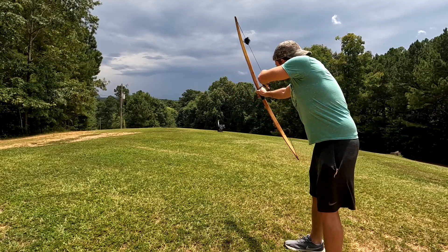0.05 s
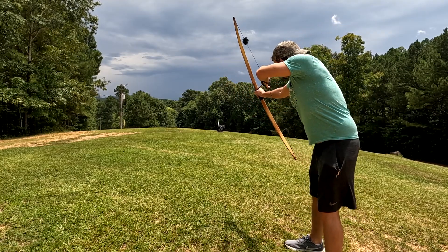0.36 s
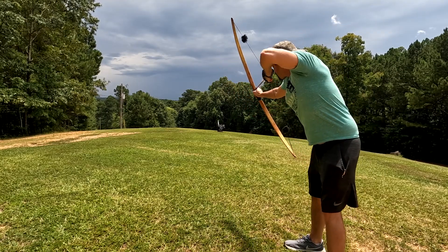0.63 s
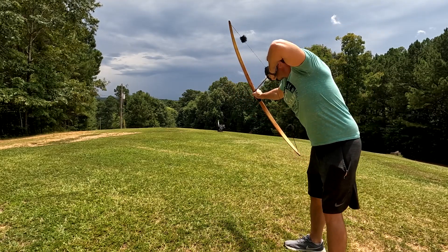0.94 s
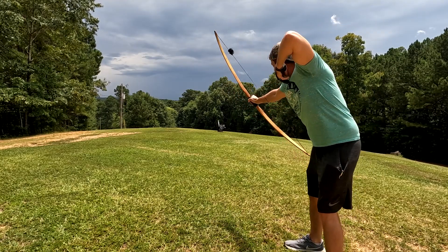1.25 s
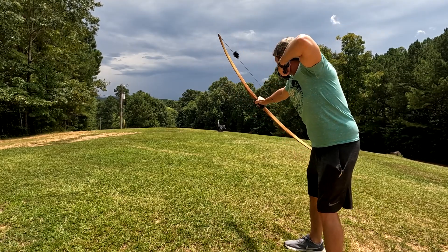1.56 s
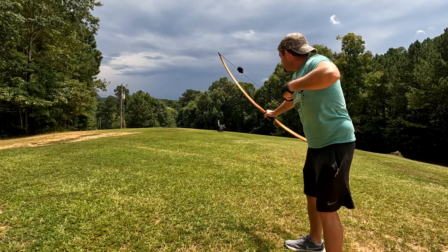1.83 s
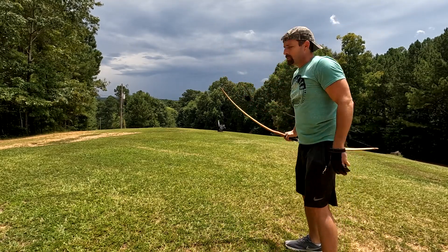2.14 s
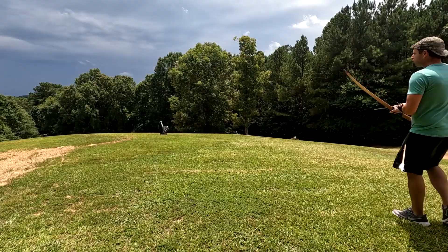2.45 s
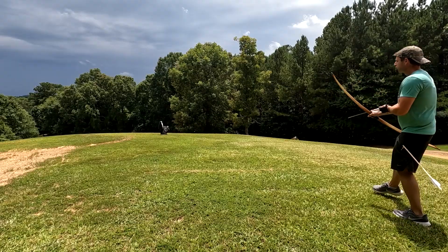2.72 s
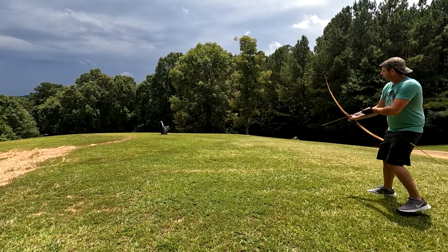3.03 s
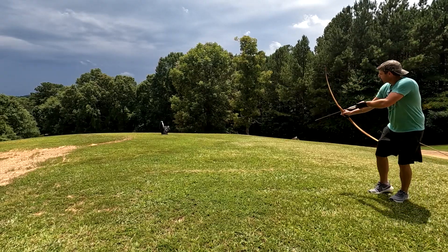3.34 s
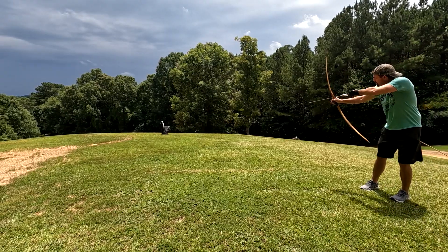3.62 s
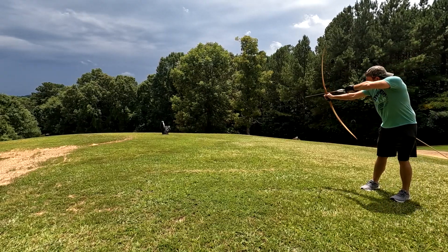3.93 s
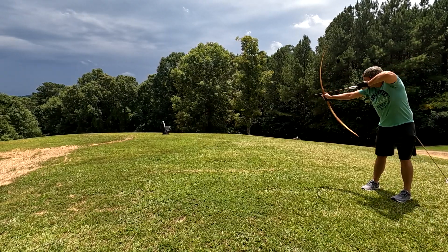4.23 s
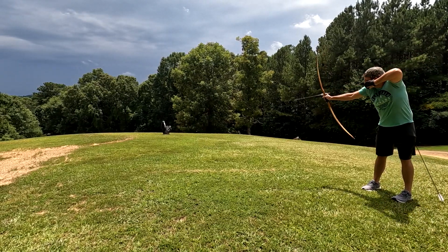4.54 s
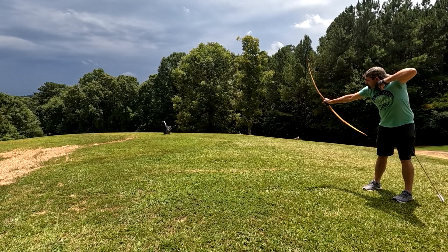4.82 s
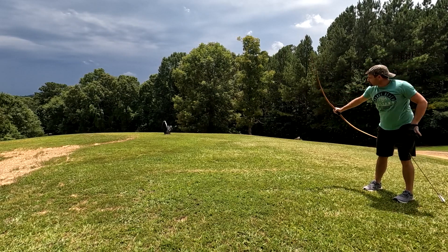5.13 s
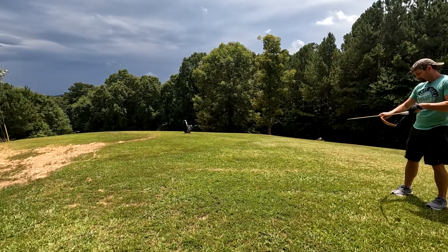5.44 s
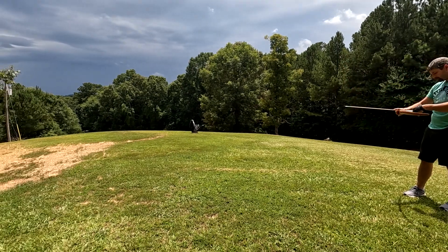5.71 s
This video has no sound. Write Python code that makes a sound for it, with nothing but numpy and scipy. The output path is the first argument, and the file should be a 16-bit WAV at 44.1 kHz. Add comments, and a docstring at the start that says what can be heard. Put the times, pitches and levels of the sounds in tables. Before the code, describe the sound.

Gusty wind rumbles and pops on the microphone in an open field. About a second in, a wooden bow shoots with a quick swish and a sharp string crack, and the arrow thuds into a target, echoing briefly off trees. The wind eases, leaving a faint hiss of leaves and insects and soft steps in grass. A second, thinner snap brings a louder hit, then the gusts return with a dry click.

```python
"""A windy, tree-lined field, where an archer shoots a wooden longbow twice.
Each shot is the swish of the arrow leaving, the crack of the string, an echo off the trees and a thud
in the target; between the shots he steps through the grass and draws again. Gusts ride on a steady
breeze and buffet the microphone, over a bed of leaves, insects and two far birds.
Two dry clicks cut in; at the first, the image opens from mono to stereo."""
import sys
import numpy as np
from scipy import signal
from scipy.fft import irfft, next_fast_len
from scipy.io import wavfile
from scipy.ndimage import uniform_filter1d

SR = 44100
rng = np.random.default_rng(int(sys.argv[2]) if len(sys.argv) > 2 else 0)


def inscribe(sig):
    """Save sig as 16-bit PCM at rate SR to the path in sys.argv[1].

    A 1-D sig is mono; a 2-D sig holds one channel per row.
    Samples are clipped to [-1, 1] before scaling.
    """
    pcm = np.round(np.clip(np.atleast_2d(sig).T, -1, 1) * 32767)
    wavfile.write(sys.argv[1], SR, pcm.astype(np.int16))


N = 258867
T = np.arange(N) / SR
STEREO_FROM_S = 2.333

# arrow sliding off the bow (time [s], level [dB], attack [s], decay [s], tilt [dB/octave])
SWISHES = [(1.081, -14.5, 0.0025, 0.0063, -3), (1.096, -15.5, 0.0068, 0.0095, 3.5),
           (4.6575, -22.5, .002, .0025, 0), (4.668, -29, .006, 0.0086, -2)]
# airy body of the swish (frequency [Hz], level [dB])
SWISH_EQ = [(150, -15.5), (500, -7.5), (850, -5.5), (1600, -8), (2600, -6), (4200, -11.5), (6500, -16.5),
            (8500, -30), (13000, -37), (16000, -54)]
# shaft bumping the grip, limbs jolting to a stop (time [s], level [dB], pitch [Hz], half width [s])
KNOCKS = [(1.0807, -12.5, 1000, 0.00095), (1.085, -9.5, 960, 0.00085), (1.1, -5.5, 250, .0012),
          (4.6754, -23, 1000, .0006)]
# string slapping home (time [s], level [dB], decay [s], tilt [dB/octave])
SLAPS = [(1.0949, -5.5, 0.00074, -1), (1.0959, -5.5, 0.0014, 0), (1.099, -8.5, .0055, -1),
         (4.6702, -6.5, 0.0004, 5), (4.6712, -9.5, 0.0018, 3), (4.6753, -22, 0.0055, -1.5)]
# low punch and bright snap of the slap (frequency [Hz], level [dB])
SLAP_EQ = [(80, -5.5), (200, 6.5), (420, -0.5), (620, -10), (1000, -6), (2200, -5.5), (4700, 0),
           (6500, -7.5), (8200, -18), (12000, -37), (16000, -56)]
# woody ring of stave and shaft (frequency [Hz], level [dB], t60 [s])
WOOD_MODES = [(75, 7, 0.16), (905, -1, 0.065), (1026, 2.5, 0.063), (1320, 4.5, 0.035), (1700, 0, 0.05),
              (2140, 8.5, 0.046), (2630, 0, 0.053), (3450, -3, 0.06), (3840, 1, 0.03), (4450, -3, 0.092),
              (5180, 5.5, 0.028), (5850, 0, 0.05)]
def bow_release(ring_db):
    """The arrow swishes past the grip, then the string slaps home and the wood rings."""
    out = np.zeros(N)
    for row in SWISHES:
        add(out, *burst(SWISH_EQ, *row))
    for row in KNOCKS:
        add(out, *knock(*row))
    for s, db, decay, tilt_db in SLAPS:
        add(out, *burst(SLAP_EQ, s, db, attack=0.0001234, decay=decay, tilt_db=tilt_db))
        push = np.sqrt(decay / 0.0013)  # a longer contact puts more energy into the wood
        add(out, s, amp(db + ring_db) * push * ring(WOOD_MODES, tilt_db=0.3 * tilt_db))
    return out


# rising zip of string on glove (time [s], pitch [Hz], level [dB])
ZIP = [(4.653, 1550, -49), (4.657, 1606, -18), (4.661, 1753, -39), (4.664, 2200, -37), (4.668, 3010, -36)]
# twang after each shot (time [s], level [dB])
TWANGS = [(1.096, -23.5), (4.671, -29.5)]
# tone of the taut string (frequency [Hz], level [dB], t60 [s])
STRING_MODES = [(884, 0, 0.097), (1250, -3, .13), (1678, -5, 0.07), (2230, -22, 0.037)]
def bowstring():
    """The string hums briefly after each shot; on the second it first zips off the glove."""
    out = glide(ZIP)
    for s, db in TWANGS:
        add(out, s, amp(db) * ring(STRING_MODES))
    return out


# feather fly-aways (time [s], level [dB], attack [s], decay [s], tilt [dB/octave])
FLIGHTS = [(1.177, -37.5, .015, 0.033, -2), (4.742, -35.5, 0.014, 0.045, -1)]
def arrow_flight(right_db=-6):
    """Air hisses over the feathers as the arrow flies off to the left."""
    out = np.zeros((2, N))
    for channel in out:
        for row in FLIGHTS:
            add(channel, *burst(RUSTLE_EQ, *row))
    return out * amp([[0], [right_db]])


# target hits (time [s], crack [dB], tilt [dB/octave], reflection [gain], thud delay [s],
# punch [dB], punch pitch [Hz], punch half width [s], boom [dB])
HITS = [(1.3613, -17.5, -2, .55, 0.00763, -9, 300, .0025, -14),
        (4.888, -12, 0.5, 0.096, 0.00688, -5, 400, .0018, -4.5)]
# bite of the point going in (frequency [Hz], level [dB])
CRACK_EQ = [(150, -8), (650, 7), (1000, 0), (1600, 4.5), (2400, -4.5), (3600, 2.5), (4500, -8), (6500, -4),
            (9500, -27.5), (12000, -27), (16000, -57)]
# tight ring of the arrow held in the target (frequency [Hz], level [dB], t60 [s])
SHAFT_MODES = [(1430, -9, 0.0081), (2240, 0.5, 0.0083), (2830, -13.5, 0.0077), (3100, -18, 0.018),
               (3730, -7, 0.009), (4740, -12, 0.0095), (5840, -16.5, 0.0084)]
def target_hit(shaft_db=12, shaft_attack=0.00071, crack_attack=.0003, crack_decay=.0014):
    """The point cracks the target's skin and the shaft rings; the arrow punches in, the block booms."""
    out = np.zeros(N)
    for s, crack_db, tilt_db, reflection, delay, punch_db, punch_hz, width, boom_db in HITS:
        start, crack = burst(CRACK_EQ, s + crack_attack, crack_db, crack_attack, crack_decay, tilt_db)
        shaft = amp(crack_db + shaft_db) * ring(SHAFT_MODES, tilt_db)
        shaft *= 1 - np.exp(-(T[:len(shaft)] / shaft_attack) ** 2)
        for lag_s, gain in ((0, 1), (.00062, reflection)):  # a close reflection hollows the crack
            add(out, start + lag_s, gain * crack)
            add(out, s + lag_s, gain * shaft)
        add(out, *knock(s + delay, punch_db, punch_hz, width))
        add(out, *boom(s + delay, boom_db))
    return out


def knock(s, db, hz, width, sag_s=.024):
    """A dull knock peaking at time s, its pitch sagging as the contact softens: (start, sound)."""
    t = np.arange(-round(3 * width * SR), round(8 * width * SR)) / SR
    cycles = hz * sag_s * (1 - np.exp(-t / sag_s))
    envelope = np.where(t < 0, np.exp(-.5 * (t / width) ** 2), 1 / np.cosh(t / width))
    return s + t[0], amp(db) * envelope * np.cos(2 * np.pi * cycles)


def boom(s, db, hz=174, attack=.0005, decay=.0072):
    """The soft target block is pushed into one low, quickly damped swing: (start, sound)."""
    t = T[:SR // 8] - .01
    envelope = np.exp(-t / decay) / (1 + np.exp(-t / attack))
    return s + t[0], amp(db) * envelope * np.cos(2 * np.pi * hz * t)


# colour and length of the tail off the trees (frequency [Hz], level [dB], t60 [s])
TREE_REVERB = [(150, 0.5, 0.42), (450, 2, 0.52), (1000, 2, 0.96), (2300, -1, 0.94), (4000, -2.5, 0.82),
               (8000, -5, 0.76), (12500, 2, 0.49)]
# slapback of the bow (delay [s], level [dB], half width [s])
BOW_RETURNS = [(.073, -54, 0.016)]
# slapbacks of the target (delay [s], level [dB], half width [s])
TARGET_RETURNS = [(.046, -50, 0.014), (0.104, -54.5, 0.029), (.187, -59.5, .008)]
def tree_echo(source, returns, wash_db, build_s, right_db, directions=3):
    """Grass and trees scatter the source into a wash; each stand of trees answers with a swell."""
    out = np.zeros((2, N))
    for _ in range(directions):
        hz, t, scatter = signal.stft(rng.standard_normal((2, SR)), SR, nperseg=256)
        colour_db, t60 = (curve_at(np.array(TREE_REVERB)[:, [0, k]], hz)[:, None] for k in (1, 2))
        wash = amp(wash_db) * np.exp(-np.log(1000) * t / t60) * (1 - np.exp(-t / build_s))
        swells = sum(amp(db) * np.exp(-((t - delay) / width) ** 2) for delay, db, width in returns)
        tail = signal.istft(scatter * amp(colour_db) * np.hypot(wash, swells), SR, nperseg=256)[1]
        out += signal.fftconvolve(source()[None], tail, axes=1)[:, :N]
    return out / np.sqrt(directions) * amp([[0], [right_db]])


# shoe and cloth foley (time [s], level [dB], attack [s], decay [s], tilt [dB/octave])
BRUSHES = [(2.435, -52.5, 0.02, 0.025, 0.5), (2.935, -53, 0.019, 0.058, 0),
           (3.07, -46.5, 0.038, 0.04, -1.5), (3.16, -55, 0.017, 0.02, 5), (3.319, -46.5, .012, 0.032, 0),
           (4.494, -48.5, 0.0049, 0.016, 5)]
# soft rustle of grass, cloth and feathers (frequency [Hz], level [dB])
RUSTLE_EQ = [(400, -10), (1300, -1), (3000, -2), (7000, -6), (9300, -19.5), (12100, -15), (16000, -41)]
# arrow ticking on the bow (time [s], level [dB], pitch [Hz], t60 [s])
TICKS = [(3.463, -41.5, 5133, 0.03), (4.618, -35.5, 5600, 0.0072)]
# thin transient of a tick (frequency [Hz], level [dB])
TICK_EQ = [(1500, -29.5), (3500, -16.5), (5000, 0), (7500, 1), (9000, -15), (16000, -28)]
def handling():
    """Shoes and clothes brush as the archer moves, and the arrow ticks against the bow."""
    out = np.zeros(N)
    for row in BRUSHES:
        add(out, *burst(RUSTLE_EQ, *row))
    for s, db, hz, t60 in TICKS:
        add(out, s, amp(db) * ring([(hz, 0, t60)]))
        add(out, *burst(TICK_EQ, s, db - 5, attack=0.00021, decay=0.000565, tilt_db=3))
    return out


# sub weight of the wind (frequency [Hz], level [dB])
RUMBLE_EQ = [(8, -5.5), (25, 6), (55, 5), (90, -2.5), (130, -9), (200, -42.5), (400, -55.5), (1500, -130)]
# its low-mid flap (frequency [Hz], level [dB])
FLUTTER_EQ = [(40, -19.5), (110, 4.5), (170, 0.5), (250, -6), (400, -21), (600, -31.5), (1200, -77.5),
              (4000, -110)]
# pops of single eddies (time [s], peak [dB], half width [s])
EDDIES = [(0.138, -4, 0.0012), (.565, -0.7, 0.00084), (0.626, -6.5, 0.0013), (0.671, -6, 0.0016),
          (5.376, -7.5, 0.0014), (5.415, -15, 0.0011), (5.446, -7.5, 0.0018), (5.465, -17, 0.0011),
          (5.523, -6.5, 0.0011), (5.739, -9.5, 0.0015)]
# wind balance as the left side is sheltered (time [s], left minus right [dB])
SHELTER = [(2.4, -0.5), (3.3, 0), (4.2, -2.5), (4.7, 0.5), (5.2, -6.5)]
def wind(side_db=-15, buffet_db=2.5):
    """Slow rumble, faster flutter and single eddies strike the microphone, a little unlike each side."""
    rumble = wind_strength(breeze_db=-33, layer=0, steepness=1)
    flutter = wind_strength(breeze_db=-42.5, layer=1, steepness=1.5)
    flutter *= amp(buffet_db * wavering(seconds=0.01))
    mid, side = (turbulence(RUMBLE_EQ, rumble, usual_db=-21, hurry=.13, even_samples=2000)
                 + turbulence(FLUTTER_EQ, flutter, usual_db=-26, hurry=.05, even_samples=1100)
                 for _ in range(2))
    mid /= (1 + mid ** 4) ** .25  # soft clip
    side *= amp(side_db)
    for s, db, width in EDDIES:
        passage = (T - s) / width
        mid *= 1 - np.exp(-passage ** 2 / 20)  # one big eddy pushes the smaller ones aside
        mid += amp(db) * passage * np.exp((1 - passage ** 2) / 2)  # suction, then pressure
    pan = np.sqrt(automation(SHELTER))
    return np.array([(mid + side) * pan, (mid - side) / pan]) * signal.windows.tukey(N, .002)


# gust swells (peak time [s], rumble [dB], flutter [dB], rise [s], fall [s])
GUSTS = [(0.012, -13, -14.5, 0.028, 0.028), (.165, -5.5, -33, 0.04, .065), (.435, -12, -28.5, 0.056, 0.029),
         (.5, -16, -38, .4, 0.36), (.5, -14, -24, 0.046, .035), (0.581, -11, -18.5, 0.049, .12),
         (0.735, -10.5, -21.5, 0.045, 0.041), (.88, -21, -41, 0.035, .04), (1.689, -19, -32.5, 0.051, .06),
         (1.93, -17.5, -27.5, 0.051, .12), (2.05, -21, -25, 0.056, 0.068), (2.18, -18.5, -39, 0.022, .025),
         (3.35, -23, -44.5, 0.034, 0.055), (4.109, -26, -52, 0.06, 0.09), (5.28, -20, -42, 0.16, 0.085),
         (5.38, -11, -24, 0.038, 0.17), (5.521, -15, -21.5, 0.022, 0.036), (5.76, -14, -35.5, 0.034, .11)]
def wind_strength(breeze_db, layer, steepness, wander_db=1.5):
    """A wandering breeze and its gusts add in power; layer 0 is the rumble, 1 the flutter."""
    power = amp(breeze_db + wander_db * wavering(seconds=0.0903)) ** 2
    for s, *layer_db, rise, fall in GUSTS:
        from_peak = abs(T - s) / np.where(T < s, rise, fall)
        power += (amp(layer_db[layer]) * np.exp(-steepness * from_peak ** 1.396)) ** 2
    return np.sqrt(power)


def turbulence(spectrum, strength, usual_db, hurry, even_samples):
    """A stronger wind sweeps its eddies past faster, so the noise rises in pitch as well as level."""
    speed = np.clip((strength / amp(usual_db)) ** hurry, .5, 2)
    swept = np.interp(np.cumsum(speed), np.arange(2 * N), noise(spectrum, size=2 * N))
    local_rms = np.sqrt(smooth(swept ** 2, even_samples) + 1e-9)
    return strength * swept / local_rms


# dry clicks (time [s], level [dB])
CLICKS = [(2.332, -30), (5.339, -15.5)]
def clicks(decay=0.0023):
    """Sudden small steps that sink back to rest."""
    out = np.zeros(N)
    for s, db in CLICKS:
        add(out, s, amp(db) * np.exp(-T[:SR // 20] / decay))
    return out


# leafy bed of the mono opening (frequency [Hz], level [dB])
LEAVES_EQ = [(290, -6.5), (500, -2), (900, -6.5), (1400, -6), (2260, -16), (5100, -19.5), (9900, -32.5),
             (11400, -39), (12300, -34), (13200, -41), (16000, -56)]
# its fader ride (time [s], level [dB])
LEAVES_FADER = [(0.04, -44.5), (0.9, -40.5), (2.28, -45)]
# open-field bed that follows (frequency [Hz], level [dB])
FIELD_EQ = [(240, -9.5), (400, -1.5), (800, -12), (1300, -12), (2150, -18.5), (4000, -20), (5500, -17),
            (7600, -21.5), (9000, -31), (12300, -32), (16000, -48)]
# its fader ride (time [s], level [dB])
FIELD_FADER = [(2.38, -51.5), (2.65, -54), (3.45, -49.5), (3.9, -53.5), (5.82, -50.5)]
def leaves_and_insects(waver_db=1.21):
    """The hiss of leaves and insects around the field, wavering a little."""
    leaves = automation(LEAVES_FADER) * wide_noise(LEAVES_EQ)
    field = automation(FIELD_FADER) * wide_noise(FIELD_EQ)
    return np.where(T < STEREO_FROM_S, leaves, field) * amp(waver_db * wavering(seconds=0.033))


# stereo image of the beds (frequency [Hz], left-right correlation [0-1])
BED_CORRELATION = [(60, .93), (300, 0.88), (700, 0.8), (1400, 0.47), (7000, 0.66), (15000, .1)]
def wide_noise(spectrum):
    """Stereo noise, centred in the bass and wider toward the treble."""
    size = next_fast_len(N)
    hz = np.fft.rfftfreq(size, 1 / SR)
    correlation = curve_at(BED_CORRELATION, hz)
    mid, side = np.exp(2j * np.pi * rng.random((2, len(hz)))) * amp(curve_at(spectrum, hz))
    mid, side = mid * np.sqrt(1 + correlation), side * np.sqrt(1 - correlation)
    return unit_rms(irfft(np.array([mid + side, mid - side]), size)[:, :N])


# thin falling whistle (time [s], pitch [Hz], level [dB])
CHIRP = [(5.205, 6780, -66.5), (5.22, 6580, -56), (5.236, 6190, -69), (5.255, 5940, -56), (5.27, 5690, -70)]
# hoarse throat of a caw (frequency [Hz], level [dB])
CAW_EQ = [(900, -35), (1300, -4), (1470, -4), (1650, -10), (1950, -24), (2240, -14), (3000, -37)]
def birds():
    """Two far birds: a gliding whistle and a faint, breathy call."""
    out = glide(CHIRP)
    add(out, *burst(CAW_EQ, 3.42, db=-49.5, attack=.05, decay=.05, tilt_db=-1))
    return out


def burst(spectrum, s, db, attack, decay, tilt_db):
    """A puff of noise that swells up to time s and dies away: (start, sound)."""
    t = np.arange(-round(8 * attack * SR), round(10 * decay * SR) + 256) / SR
    envelope = np.exp(-abs(t) / np.where(t < 0, attack, decay))
    puff = unit_rms(noise(spectrum, tilt_db, size=len(t)) * envelope) * np.sqrt(np.mean(envelope ** 2))
    return s + t[0], amp(db) * puff


def ring(modes, tilt_db=0):
    """Decaying modes, alternate ones swinging the opposite way."""
    t = T[:SR // 4]
    return sum((-1) ** k * amp(db + tilt_db * octaves(hz))
               * np.exp(-np.log(1000) * t / t60) * np.sin(2 * np.pi * hz * t)
               for k, (hz, db, t60) in enumerate(modes))


def glide(points):
    """A tone that follows a curve of pitch and level."""
    s, hz, db = np.transpose(points)
    envelope = amp(np.interp(T, s, db)) * (T > s[0]) * (T < s[-1])
    return envelope * np.sin(2 * np.pi * np.cumsum(np.interp(T, s, hz)) / SR)


def noise(spectrum, tilt_db=0, size=N):
    """Noise of rms 1 with a given spectrum and tilt per octave."""
    hz = np.fft.rfftfreq(next_fast_len(size), 1 / SR)
    phases = np.exp(2j * np.pi * rng.random(len(hz)))
    gains = amp(curve_at(spectrum, hz) + tilt_db * octaves(hz))
    return unit_rms(irfft(phases * gains, next_fast_len(size))[:size])


def wavering(seconds):
    """Random drift of rms 1 that changes over about this time."""
    return unit_rms(smooth(rng.standard_normal(N), round(seconds * SR)))


def smooth(x, samples):
    """A moving average, run twice."""
    return uniform_filter1d(uniform_filter1d(x, samples), samples)


def amp(db):
    """Decibels to gain."""
    return 10 ** (np.asarray(db) / 20)


def unit_rms(x):
    """Scales to rms 1."""
    return x / np.sqrt(np.mean(x ** 2) + 1e-20)


def curve_at(points, hz):
    """Reads a table on a log-frequency axis."""
    knots_hz, values = np.transpose(points)
    return np.interp(np.log(hz + 1), np.log(knots_hz + 1), values)


def octaves(hz):
    """Octaves above the 2500 Hz tilt pivot, flat below 300 Hz."""
    return np.log2(np.maximum(hz, 300) / 2500)


def automation(points):
    """Gain over time from a dB curve."""
    return amp(np.interp(T, *np.transpose(points)))


def add(mix, s, sound):
    """Mixes a sound in at time s."""
    part = mix[max(round(s * SR), 0):][:len(sound)]
    part += sound[:len(part)]


def from_right(x, left_db):
    """A sound from the right reaches the left channel one sample later, trimmed by left_db."""
    return np.array([amp(left_db) * np.roll(x, 1), x])


def scene():
    """Bow, arrow, target and their echoes over wind, leaves and birds."""
    bow = from_right(bow_release(ring_db=-25.5) + bowstring(), left_db=-1.0)
    hits_and_foley = from_right(target_hit() + handling(), left_db=0.5)
    echoes = tree_echo(lambda: bow_release(ring_db=-29.5), BOW_RETURNS,
                       wash_db=-47, build_s=0.0053, right_db=-2)
    echoes += tree_echo(lambda: target_hit(shaft_db=8), TARGET_RETURNS,
                        wash_db=-47, build_s=0.045, right_db=-3)
    archery = bow + hits_and_foley + echoes + arrow_flight()
    return archery + wind() + leaves_and_insects() + birds() + clicks()


def record(dry, cutoff_hz=15800):
    """Mono opening into stereo, hard-clipped, then low-passed."""
    image = np.where(T < STEREO_FROM_S, dry.mean(0), dry)
    lowpass = signal.firwin(401, cutoff_hz, window=("kaiser", 9), fs=SR)
    return signal.oaconvolve(np.clip(image, -1, 1), lowpass[None], "same")


dry = scene()
out = record(dry)
inscribe(out)
```